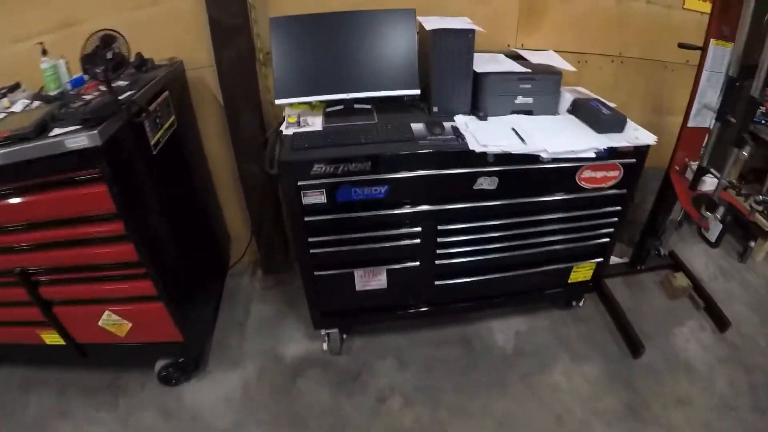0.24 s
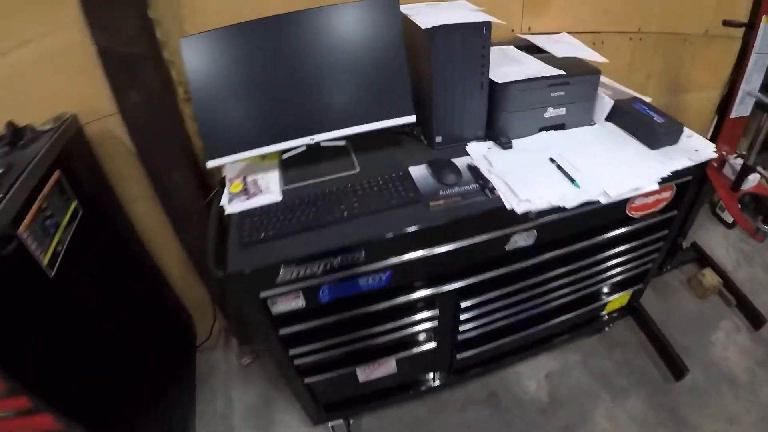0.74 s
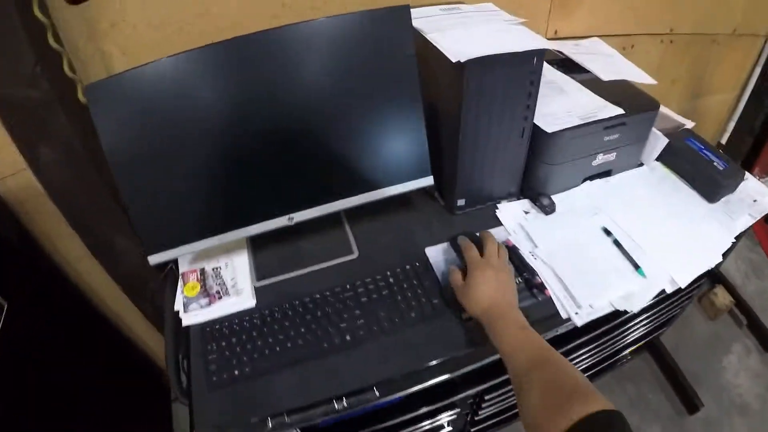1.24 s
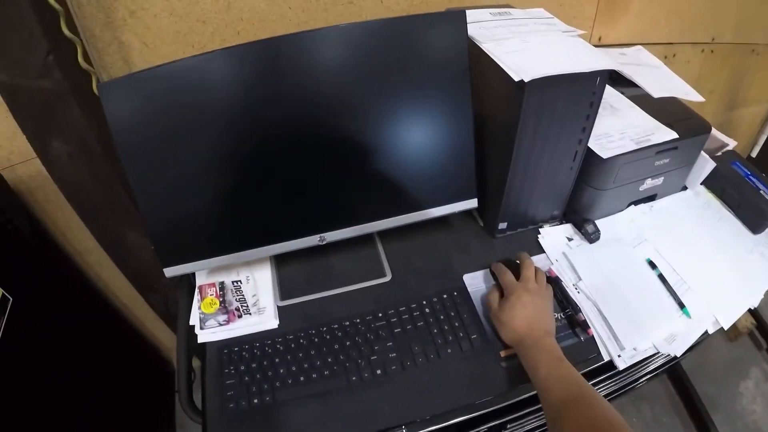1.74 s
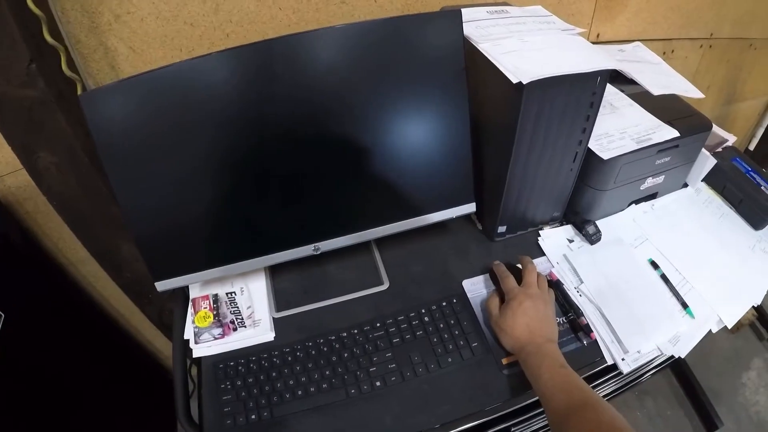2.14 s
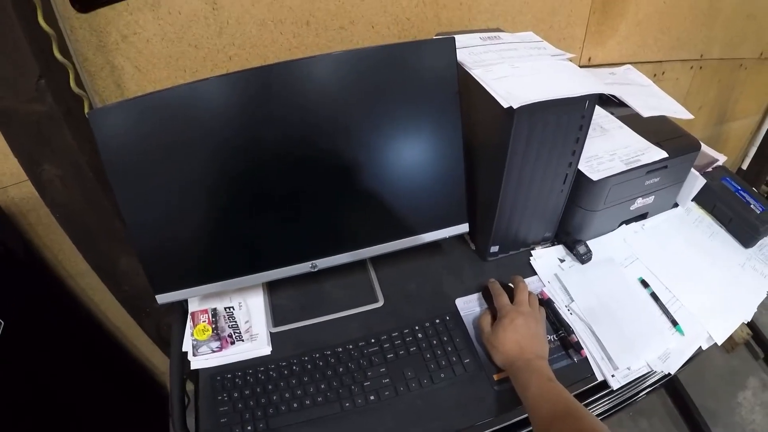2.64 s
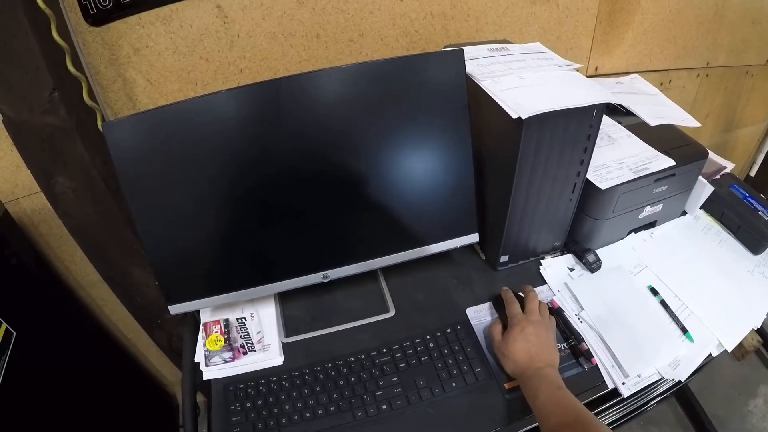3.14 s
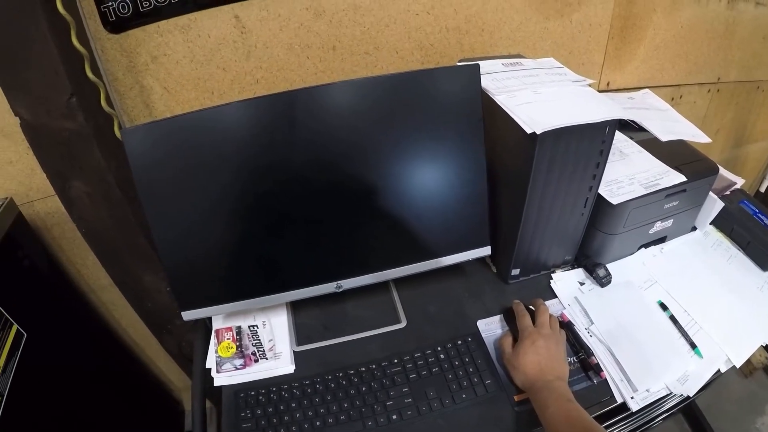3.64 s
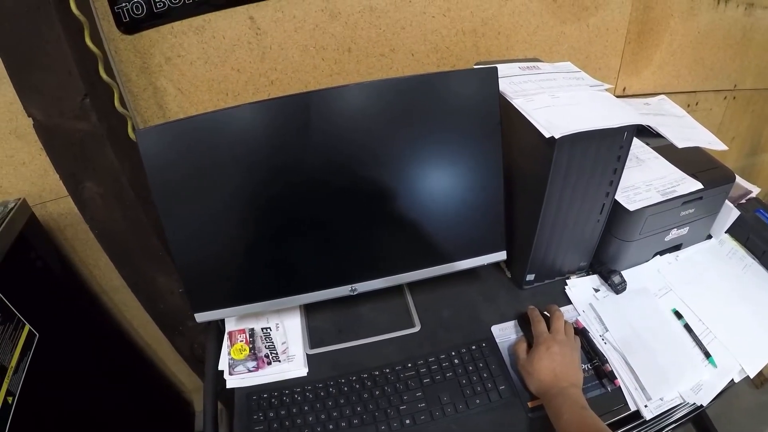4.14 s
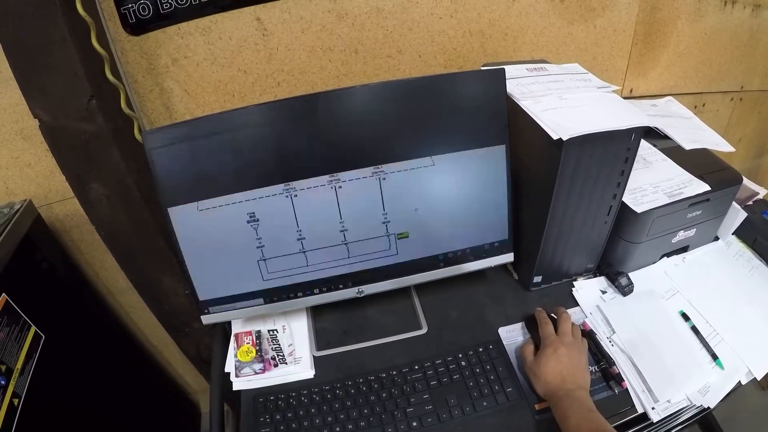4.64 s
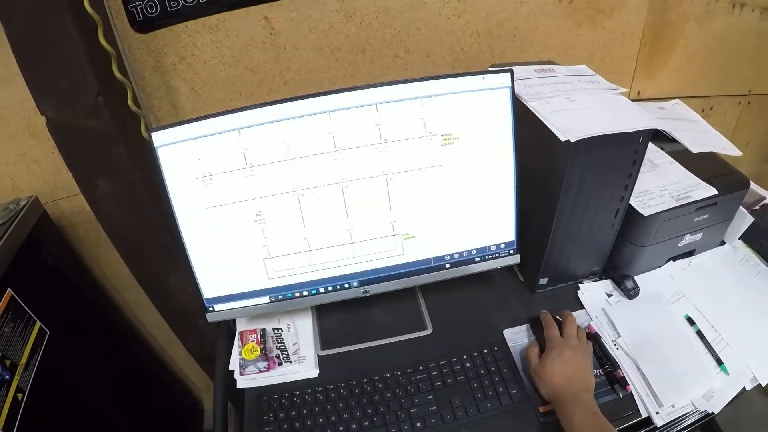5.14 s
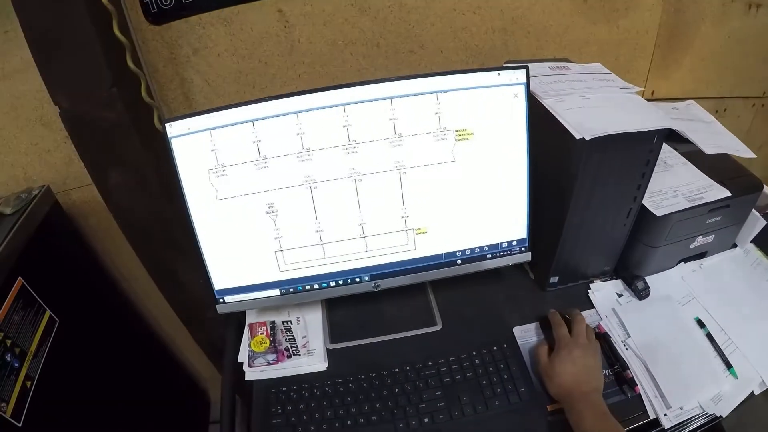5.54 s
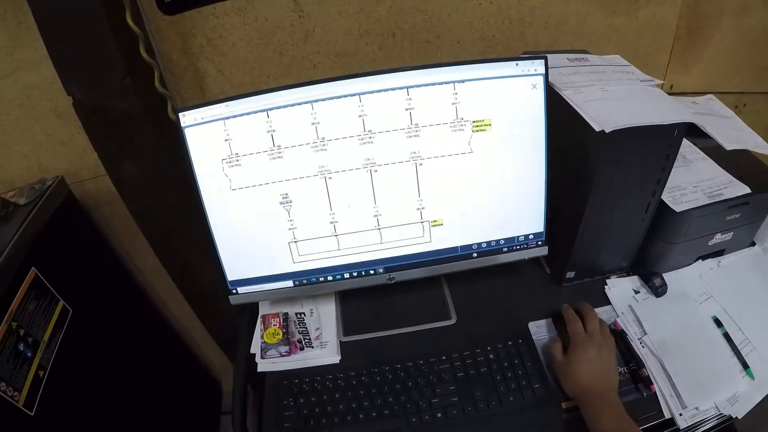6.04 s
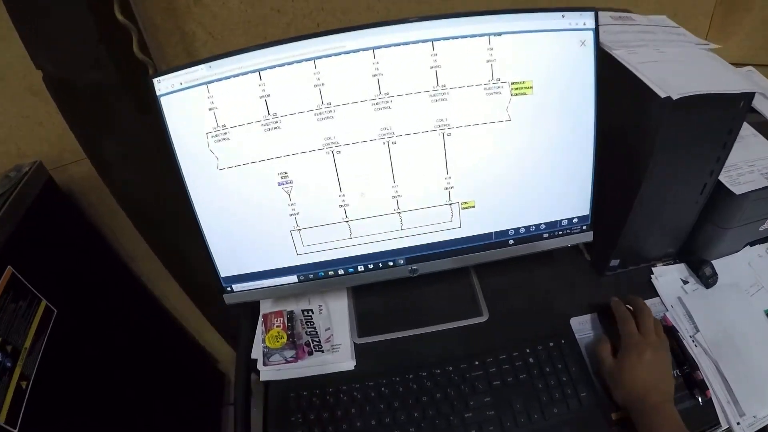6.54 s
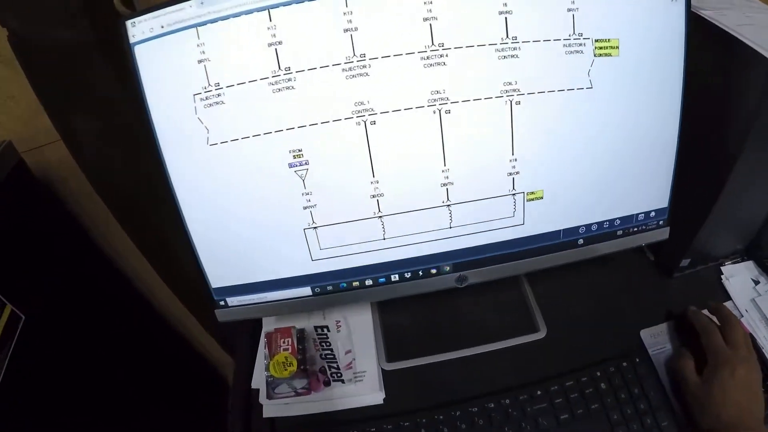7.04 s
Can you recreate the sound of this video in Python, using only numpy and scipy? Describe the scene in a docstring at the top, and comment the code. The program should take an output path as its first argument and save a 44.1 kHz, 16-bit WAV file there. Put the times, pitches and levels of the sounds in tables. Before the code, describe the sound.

A car engine idles unevenly with a deep, limping boom in a repair shop while someone takes steps, clothes swishing, then stands at a faintly whining computer.

```python
"""A limping engine boom fills a repair shop: a V6 idles with one dead cylinder, its uneven firings
ringing standing waves in exhaust and hall over a bed of exhaust gas noise. Belts and intake hiss and
valves tick behind it as shaped noise; a computer whines as thin trembling tones. Someone wearing the
microphone walks to a tool chest and stays: steps are low rocking thumps, clothes swishing noise,
knocks short noise bursts."""
import sys
import numpy as np
from scipy import signal
from scipy.fft import rfft, irfft, next_fast_len
from scipy.io import wavfile

SR = 44100
rng = np.random.default_rng(int(sys.argv[2]) if len(sys.argv) > 2 else 0)


def materialize(psi):
    """Save the field psi as 16-bit PCM at rate SR to the path in sys.argv[1].

    A 1-D psi becomes a single channel; in a 2-D psi each row is a channel.
    """
    bounded = np.clip(np.atleast_2d(psi).T, -1, 1)
    quanta = np.round(bounded * 32767).astype(np.int16)
    wavfile.write(sys.argv[1], SR, quanta)


N = 321489
TIME = np.arange(N) / SR  # s
FREQ = np.maximum(np.arange(N // 2 + 1) * SR / N, .01)  # Hz, kept above zero for the logarithms

# Each entry: mean strength of one cylinder's exhaust pulse, in firing order (0 = no combustion).
CYLINDERS = [0, .575, .439, 1.433, .54, 1.39]
SWISH_FALL = 1.52  # fall of a cloth movement, times its rise


def undb(db):
    """Decibels to gain."""
    return 10 ** (np.asarray(db) / 20)


def curve(rows):
    """Join (s, value) rows by straight lines."""
    return np.interp(TIME, *np.transpose(rows))


def colour(points):
    """Gain at every frequency from (Hz, dB) points, straight over log frequency."""
    hz, db = np.transpose(points)
    return undb(np.interp(np.log(FREQ), np.log(hz), db, left=-120, right=-120))


def resonance(hz, width, freq=FREQ):
    """Complex response of one damped mode, gain 1 at its centre."""
    return 1 / (1 + 1j * (freq ** 2 - hz ** 2) / (freq * width))


def noise(response):
    """Noise of rms 1 with the given frequency response."""
    x = irfft(rfft(rng.standard_normal(N)) * response, N)
    return x / x.std()


def wander(rate):
    """Smooth random drift of spread 1, changing about rate times a second."""
    return noise(np.exp(-(FREQ / rate) ** 2))


def swell(at, length):
    """A bell-shaped rise and fall."""
    return np.exp(-((TIME - at) / length) ** 2)


def stroke(at, rise, fall):
    """A bell-shaped rise to a peak, then a fall of its own length."""
    return np.where(TIME < at, swell(at, rise), swell(at, fall))


def idle_rpm():
    """Crankshaft speed: steady, but for a spell of hunting up and down and one slow sag."""
    steady_rpm = 708.23
    hunt_rpm, period_s, crest_s = 8.2, 1.325, 1.772
    swing = np.cos(2 * np.pi * (TIME - crest_s) / period_s)
    hunt = hunt_rpm * swell(2.267, 1.136) * swing
    sag = 5.4 * swell(5.27, .95)
    return steady_rpm + hunt - sag


def run_in(cycles):
    """Extend the cycle count back before the start at steady speed, so the hall already rings."""
    run_in_s = 1  # at least; padded to a fast transform length
    lead = next_fast_len(N + int(run_in_s * SR)) - N
    before = np.arange(-lead, 0) * (cycles[1] - cycles[0])
    return np.concatenate([before, cycles])


def firings(cycles, scatter, slip_s):
    """One pulse per cylinder and engine cycle; no two burns are quite alike in strength or timing."""
    first_misfire_cycles, bank_lead_cycles = .719, .021
    k = np.arange(6 * int(cycles[0] - 2), 6 * int(cycles[-1] + 2))
    chance = rng.standard_normal((len(k), 2))
    # every second pulse comes early, from the bank with the shorter way out
    due = first_misfire_cycles + k / len(CYLINDERS) - bank_lead_cycles * (k % 2)
    slip = (slip_s * SR * chance[:, 0]).astype(int)
    at = np.searchsorted(cycles, due) + slip
    size = np.array(CYLINDERS)[k % len(CYLINDERS)] + scatter * chance[:, 1]
    heard = (due > cycles[0]) & (due < cycles[-1])
    place = np.clip(at[heard], 0, len(cycles) - 1)
    return np.bincount(place, size[heard], len(cycles))


def exhaust(pulses, away, boom_db, muffler_hz, gas_db, gas_away_db, sway_db):
    """Pulses ring standing waves; walking through their nodes shifts the drone, swaying nudges it."""
    # Standing waves of exhaust and hall. Each row: centre in Hz, width in Hz, relative level at the chest
    # in dB, polarity there, level change halfway in dB, level change on the open floor in dB.
    modes = [(24.0, 3.0, -1.3, -1, 2, 1), (30.1, 5.2, -9.6, 1, 2, 2), (42.0, 3.4, -1.2, -1, -1, -4),
             (49.3, 4.6, 0.7, 1, -2, -5), (64.0, 3.0, -0.3, 1, -4, -13), (71.6, 3.0, -19.3, -1, -3, -4),
             (79.3, 3.0, -8.8, 1, 2, 1), (87.5, 3.0, -0.6, 1, -1, -10), (102.1, 4.0, -4.1, -1, -9, -8),
             (107.1, 4.3, -20.2, -1, -2, 2), (126.1, 3.4, -10.7, 1, 1, -6), (134.9, 18.7, -13.9, -1, 5, -3),
             (152.5, 3.0, -13.3, 1, 7, 1), (165.3, 3, -19, -1, 0, -5), (169.6, 3.9, -17.7, 1, 2, -5),
             (187.4, 3.0, -13.0, -1, -3, -7), (200.3, 10.5, -23.2, 1, -2, -3),
             (203.8, 3.0, -8.7, -1, -3, -7), (220.9, 3.4, -27.6, -1, 0, 0), (234.6, 3.4, -29.5, 1, -1, -1),
             (247.5, 3, -33, 1, 0, -3), (264.6, 4.8, -26.5, -1, 0, -4)]
    # Colour of turbulent exhaust gas. Each row: frequency in Hz, relative density in dB per Hz.
    gas_colour = [(10, -4), (22, 1), (45, 0), (70, -3), (106, -6), (125, -9.5), (170, -9), (208, -4.5),
                  (226, -7.5), (245, -17), (330, -28)]
    freq = np.maximum(np.arange(len(pulses) // 2 + 1) * SR / len(pulses), FREQ[0])
    muffled = rfft(pulses) / (1 + (freq / muffler_hz) ** 10)
    boom = 0
    for hz, width, db, polarity, halfway_db, floor_db in modes:
        place_db = np.interp(away, [0, .5, 1], [0, halfway_db, floor_db])
        # swaying on the spot moves the short waves most
        place_db = place_db + sway_db * hz / muffler_hz * wander(1)
        ringing = irfft(muffled * resonance(hz, width, freq), len(pulses))[-N:]
        boom = boom + np.sign(polarity) * undb(db + place_db) * ringing
    gas = undb(gas_db + away * gas_away_db) * noise(colour(gas_colour))
    return undb(boom_db) * boom + gas


def engine_bay(cycles, throb, tick_db, flutter_db):
    """Fan, belt and intake noise throbs with the strokes, valves tick faintly, narrow bands hum."""
    # Colour of fan, belts and intake. Each row: frequency in Hz, relative density in dB per Hz.
    rush_colour = [(160, -29), (270, -0.5), (285, -7), (376, -2), (447, -4.5), (482, -7), (936, -11.5),
                   (1010, -12), (1740, -12), (2860, -18), (3080, -16), (3500, -28), (4550, -66),
                   (7700, -120)]
    # Colour of the higher hiss. Each row: frequency in Hz, relative density in dB per Hz.
    hiss_colour = [(2060, -58), (3500, -3.5), (3810, -1.5), (4080, 3.5), (4600, 4.5), (5390, -0.5),
                   (6130, 0), (7140, -11), (8410, -6.5), (9790, -8), (11700, -15.5), (13700, -19),
                   (15000, -27)]
    # Hums of pulleys and panels. Each row: centre in Hz, width in Hz of the mode (applied twice),
    # rms level in dB.
    hum_bands = [(373.5, 6, -66), (415, 8, -68), (620, 24, -71.5), (948, 22, -70.5), (1790, 50, -73)]
    strokes = len(CYLINDERS) * cycles
    pulsing = 1 + throb * np.cos(2 * np.pi * strokes)
    flutter = flutter_db * wander(1.5)
    rush = undb(-52.5 + flutter) * noise(colour(rush_colour))
    hiss = undb(-57.5 + flutter / 2) * noise(colour(hiss_colour))
    # two ticks per stroke, each of its own strength, fading until the next
    valve = (2 * strokes).astype(int)
    valve_scatter_db = 2.8
    strength = undb(tick_db + valve_scatter_db * rng.standard_normal(valve[-1] + 1))
    ticks = strength[valve] * np.exp(-(2 * strokes % 1) / 0.44)
    hums = sum(undb(db) * noise(resonance(hz, width) ** 2) for hz, width, db in hum_bands)
    return pulsing * (rush + hiss) + ticks * noise(resonance(4700, 1700) ** 2) + hums


def computer(drift_hz):
    """Thin sine tones with trembling pitch, coming up near the chest and fading late."""
    # The whine. Each row: mean pitch in Hz, rms level in dB before the carry below.
    whine = [(3095, -71.5), (4016, -76)]
    # How well it carries as the wearer turns. Each row: time in seconds, gain in dB.
    carry = [(0, -4), (1.2, -4.5), (4.3, 2), (6, 2.5), (7.29, -7)]
    tones = 0
    for hz, db in whine:
        turns = np.cumsum(hz + drift_hz * wander(25.0)) / SR
        tones = tones + undb(db) * np.sin(2 * np.pi * turns)
    return np.sqrt(2) * undb(curve(carry)) * tones


def jolts():
    """Steps and body movements rock the worn microphone on its mount at one low pitch."""
    # Each row: peak in seconds, peak level in dB, settling time in seconds.
    movements = [(.1, -18.5, .03), (.567, -19.5, .025), (.684, -23, .02), (1.091, -13.5, .055),
                 (6.58, -25.5, .04), (6.815, -26, .04), (7.155, -28, .04)]
    rock_hz, rise_s = 28.5, .02
    thumps = 0
    for at, db, fall in movements:
        rocking = np.cos(2 * np.pi * rock_hz * (TIME - at))
        thumps = thumps + undb(db) * stroke(at, rise_s, fall) * rocking
    return thumps


def clothes(grain_db, focus_db, rustle_focus_db, hall_db, hall_s):
    """Cloth catches on its weave: a broad rustle while walking, and swishes that linger in the hall."""
    # Swishes of trousers and sleeve. Each row: peak in seconds, rise in seconds, level in dB before
    # hall and grain, centre in Hz.
    swish_rows = [(.355, .025, -57, 1380), (.497, .007, -49, 4230), (.573, .007, -54, 7500),
                  (.725, .017, -60, 1600), (.85, .025, -58, 1500), (1.05, .019, -44.5, 6300),
                  (1.082, .024, -45, 5400), (1.685, .033, -52.5, 880), (6.47, .032, -53, 2900)]
    # Colour of rubbing cloth. Each row: frequency in Hz, relative density in dB per Hz.
    cloth = colour([(250, 32.5), (900, -1.5), (1600, 3.5), (3000, -1), (4400, 0.5), (6100, 1),
                    (7500, -10.5), (9500, -14.5), (15000, -31)])
    # The jacket's rustle: peak in seconds, rise in seconds, level in dB before grain, centre in Hz.
    jacket = (.88, .3, -52.5, 1200)

    def rub(hz, focus):
        """Cloth noise focused round one pitch, in dB per squared octave."""
        return noise(cloth * undb(-focus * np.log2(FREQ / hz) ** 2))

    swishes = 0
    for at, rise, db, hz in swish_rows:
        direct = stroke(at, rise, SWISH_FALL * rise)
        hall = undb(hall_db) * stroke(at, rise, hall_s)
        swishes = swishes + undb(db) * np.hypot(direct, hall) * rub(hz, focus_db)
    at, rise, db, hz = jacket
    rustle = undb(db) * stroke(at, rise, SWISH_FALL * rise) * rub(hz, rustle_focus_db)
    grain = undb(grain_db * wander(240))
    return (swishes + rustle) * grain


def taps():
    """Short, dead knocks: noise bursts through a mode, starting at once and dying exponentially."""
    # A thin tick while walking, then knocks of hand and mouse on the chest. Each row: start in seconds,
    # centre in Hz, width in Hz of the mode (applied twice), decay in seconds, starting rms level in dB.
    knocks = [(.568, 14300, 1500, .007, -60), (5.066, 2400, 2000, .004, -64), (6.638, 970, 380, .013, -48)]
    total = 0
    for at, hz, width, decay, db in knocks:
        fade = (TIME >= at) * np.exp(-abs(TIME - at) / decay)
        total = total + undb(db) * fade * noise(resonance(hz, width) ** 2)
    return total


def scene():
    """The engine, the computer and the wearer's movements at one microphone."""
    # The walk. Each row: time in seconds, distance (1 = out on the open floor, 0 = at the chest).
    walk = [(0, 1), (.35, 0.65), (.62, 0.64), (1.1, 0), (7.29, 0.1)]
    cycles = np.cumsum(idle_rpm()) / (2 * 60 * SR)  # one engine cycle is two crank turns
    pulses = firings(run_in(cycles), scatter=.02, slip_s=.00008)
    boom = exhaust(pulses, curve(walk), boom_db=36.4, muffler_hz=261,
                   gas_db=-41.0, gas_away_db=2.0, sway_db=.8)
    bay = engine_bay(cycles, throb=0.022, tick_db=-61.0, flutter_db=0.5)
    cloth = clothes(grain_db=2.0, focus_db=4.0, rustle_focus_db=5.0, hall_db=-7.0, hall_s=0.11)
    return (boom + bay + computer(drift_hz=8.2) + jolts() + cloth + taps())[None]


def record(dry):
    """The microphone's steep low-pass cuts the top."""
    top_hz = 15200
    sos = signal.ellip(8, .2, 70, top_hz, fs=SR, output="sos")
    start = dry[:, :1]  # filtered relative to the first sample, so the filter starts without a click
    return signal.sosfilt(sos, dry - start) + start


dry = scene()
out = record(dry)
materialize(out)
```